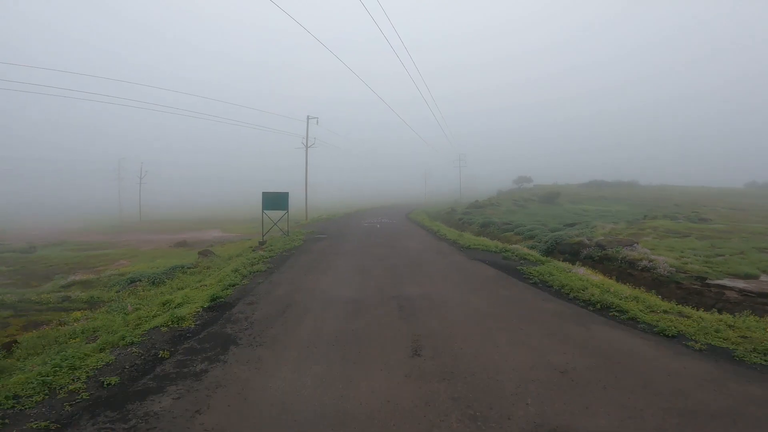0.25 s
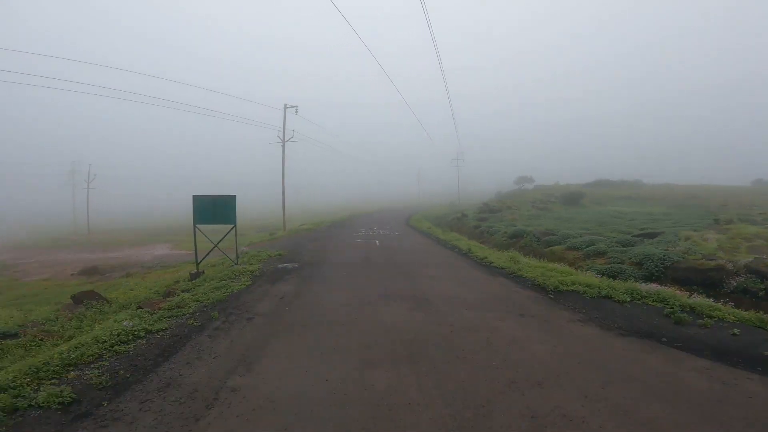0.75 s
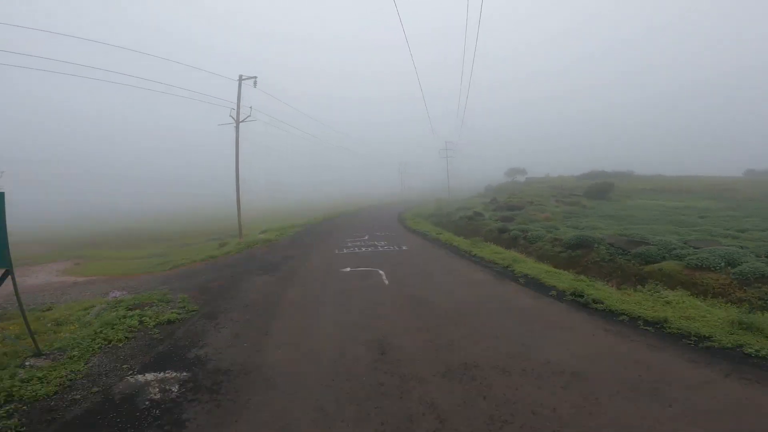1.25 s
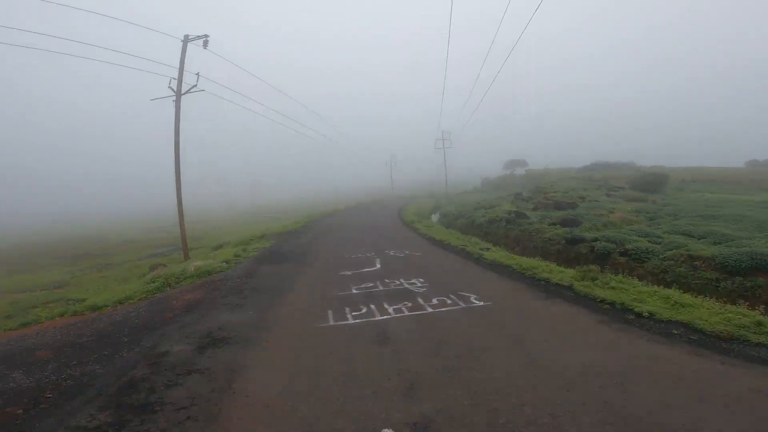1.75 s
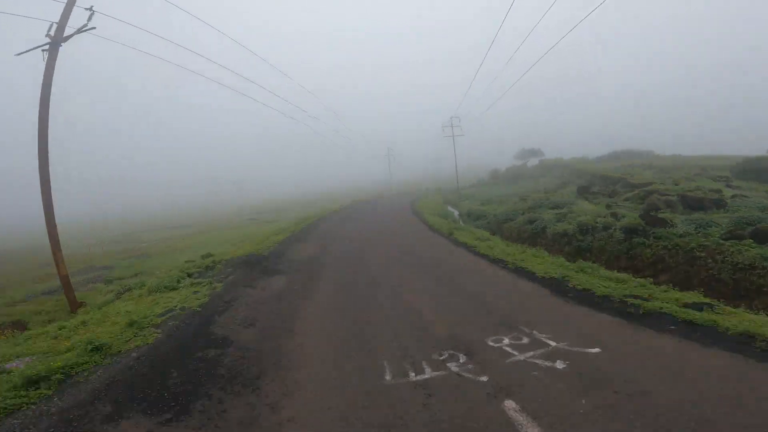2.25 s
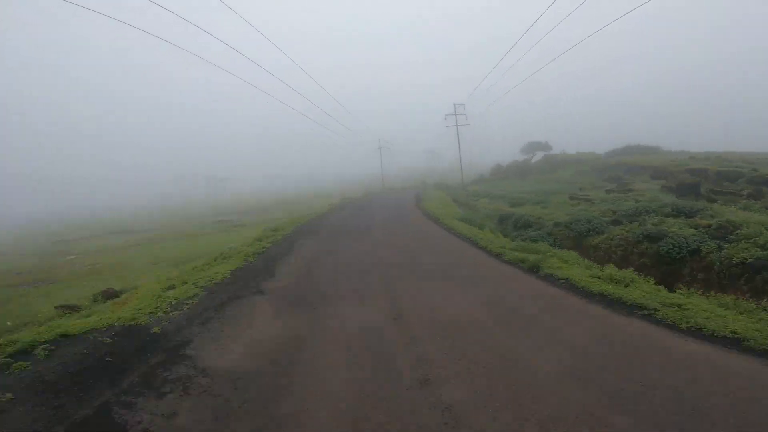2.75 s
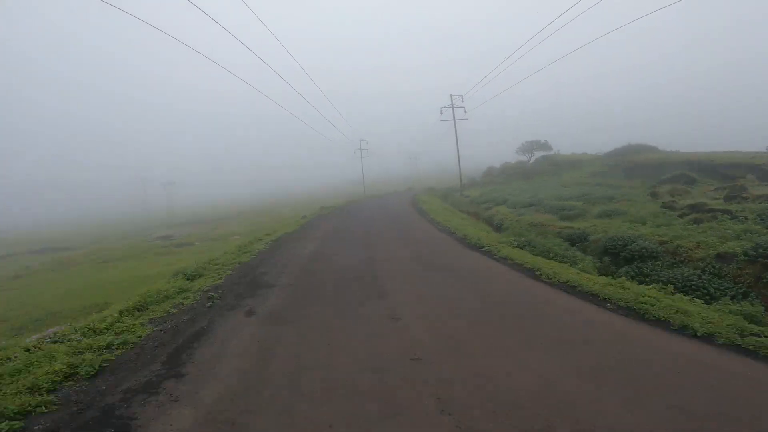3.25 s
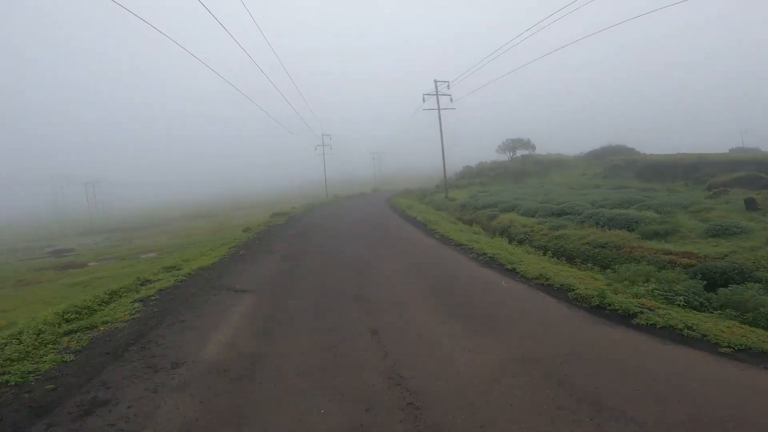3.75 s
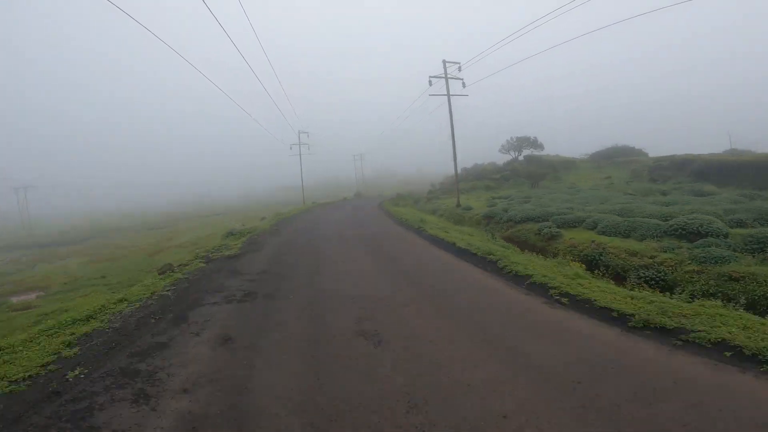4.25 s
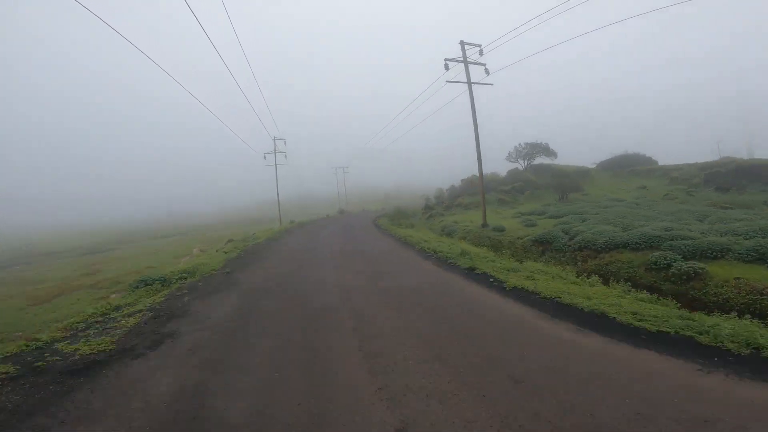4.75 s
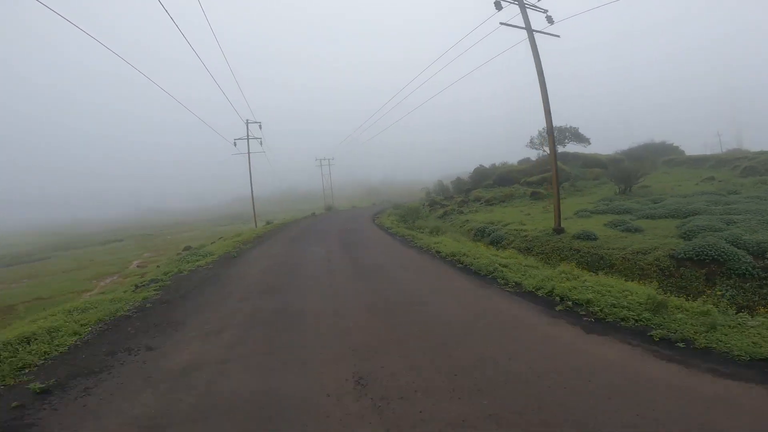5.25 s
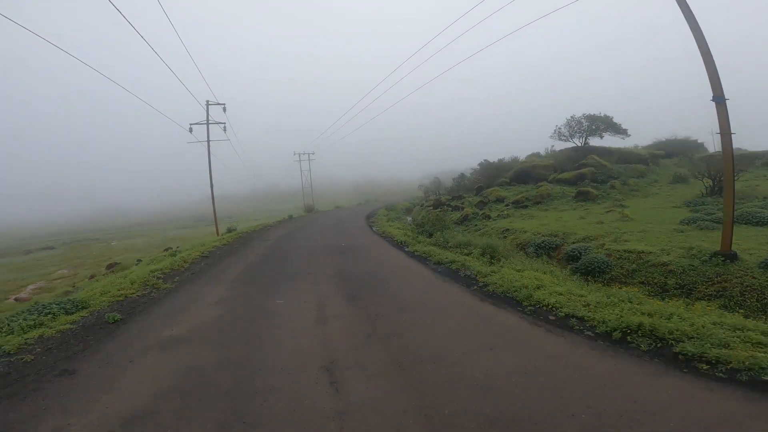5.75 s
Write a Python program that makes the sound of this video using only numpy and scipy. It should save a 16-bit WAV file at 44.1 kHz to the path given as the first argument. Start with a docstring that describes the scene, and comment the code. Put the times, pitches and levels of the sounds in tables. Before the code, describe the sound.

Heard from on board, wind rumbles and gusts over a motorcycle's steady, pulsing engine hum and the rush of tyres on damp asphalt.

```python
"""An exhaust drones and puffs 24 times a second under buffeting wind: a single-cylinder four-stroke
motorcycle cruises along a damp hill road, heard from on board. Each firing sends a pressure pulse down
the pipe; piston, valves and cam chain excite resonances, and all grow louder with the engine's load.
The wind rumbles with brief low swells, while the rush of air and the roar and hiss of the tyres
rise and fall together. A brief sizzle passes early on; later, bits of grit patter and click."""
import sys
import numpy as np
from scipy import signal
from scipy.fft import rfft, irfft
from scipy.io import wavfile
from scipy.ndimage import uniform_filter1d

SR = 44100
rng = np.random.default_rng(int(sys.argv[2]) if len(sys.argv) > 2 else 0)


def dump_mix(stems):
    """Bounce the given channels to the path in sys.argv[1] as a 16-bit WAV at rate SR."""
    frames = np.atleast_2d(stems).T  # one column per channel
    limited = np.clip(frames, -1, 1)  # hard clip at full scale
    pcm = np.round(limited * 32767).astype(np.int16)
    wavfile.write(sys.argv[1], SR, pcm)


N = 264864
T = np.arange(N) / SR
FREQS = np.arange(N // 2 + 1) * SR / N


def exhaust(cycle, load_db):
    """Periodic pressure dips form a harmonic series; the silencer keeps its low end. A puff follows."""
    # harmonics of the firing rate: multiple, level_db
    harmonics = [(1, -8.5), (2, 3.5), (3, -2), (4, -10), (5, 2), (6, -4), (8, -19), (9, -14.5), (10, -10),
                 (12, -8.5), (13, -10), (15, -11.5), (16, -17)]
    drone = 0
    for multiple, db in harmonics:
        delay_turns = 0.13 * rng.standard_normal()  # the pipe delays each harmonic differently
        amplitude = np.sqrt(2) * undb(db + 1.97 * walk(13.4))
        drone -= amplitude * np.cos(2 * np.pi * (multiple * (cycle - .9) + delay_turns))
    puff = ring(bursts(cycle, at=.86, decay=.42, scatter_db=0), [(267, 83, 0)])
    puff = undb(-10.5) * ring(puff, [(296, 660, 0)])
    return undb(-30.7 + .85 * load_db) * (drone + puff)


def piston_knock(cycle, load_db):
    """Impact excitation: the piston rings the crankcase once a cycle, louder as the ride goes on."""
    # crankcase resonances: pitch_hz, width_hz, level_db
    crankcase = [(802, 22, 4.2), (915, 36, -1), (996, 34, 1.2), (1026, 24, 1.6), (1760, 140, -7)]
    rise_db_per_s = 1.0
    knock = ring(bursts(cycle, at=.6, decay=.7, scatter_db=.6), crankcase)
    return undb(-37.7 + .85 * load_db + rise_db_per_s * T) * ring(knock, [(950, 420, 0)])


def valve_taps(cycle, load_db):
    """Two valves tap shut each cycle and excite high modes; the taps come forward late in the ride."""
    # valve gear resonances: pitch_hz, width_hz, level_db
    valve_gear = [(9270, 130, -4), (9670, 120, -1), (10050, 130, 2), (10450, 250, -9)]
    early_db, full_at_s, rise_s = -7, 4.15, .3
    soften_db = early_db * np.clip((full_at_s - T) / rise_s, 0, 1)
    inlet = bursts(cycle, at=.5, decay=.18, scatter_db=1.5)
    outlet = bursts(cycle, at=.22, decay=.15, scatter_db=2)
    return undb(-64.2 + .5 * load_db + soften_db) * ring(inlet + .5 * outlet, valve_gear)


def cam_chain(cycle, load_db):
    """Forced vibration: nearly steady noise keeps the chain's modes singing, slowly growing louder."""
    # chain resonances: pitch_hz, width_hz, level_db
    modes = [(3590, 210, 3), (6080, 180, -1.5), (7410, 120, -6.5), (8460, 90, 1.5), (8660, 80, -6)]
    rise_db_per_s = .7
    rattle = bursts(cycle, at=.26, decay=2.4, scatter_db=1.5)
    return undb(-61.3 + .6 * load_db + rise_db_per_s * T) * ring(rattle, modes)


def wind(flow_db):
    """Turbulence: large eddies push on the microphone; small ones make a rush that gusts brighten."""
    # strength of the buffeting: time_s, gain_db
    buffeting = [(0.0, -2.2), (0.28, 3.5), (0.45, -2), (.58, -1.5), (.7, 1.5), (.79, -3), (.88, 1.5),
                 (1.17, 3), (1.3, -2), (1.54, -3), (1.63, -9.5), (1.73, -8), (1.8, -3), (1.95, -1.5),
                 (2.14, 2.5), (2.34, -1), (2.52, 2.5), (2.75, 1.5), (2.9, -4), (3.04, 2.5), (3.45, 1.5),
                 (3.58, -2), (4.05, -2.5), (4.32, 3), (4.72, -1), (4.95, 2), (5.1, 0), (5.85, 2), (6.0, 2)]
    # spectrum of the large eddies: frequency_hz, density_db
    buffet_spectrum = [(1, 5), (4, 4.5), (9, 13.5), (16, -8), (30, -0.5), (45, -11), (65, -15.5),
                       (110, -14.5), (200, -25.5), (500, -70), (3000, -100)]
    # spectrum of the small eddies: frequency_hz, density_db
    rush_spectrum = [(50, 4), (110, -2.5), (170, 1.5), (300, 1), (420, -1), (550, -6.5), (700, -9.5),
                     (1200, -14), (2500, -34), (6000, -82), (15000, -85)]
    push_db, = curves(buffeting)
    eddies = colour(rng.standard_normal(N), buffet_spectrum)
    eddies = 5 * np.tanh(eddies / 5)  # a soft limit keeps the loudest buffets from clipping
    rush = colour(rng.standard_normal(N), rush_spectrum)
    coarse = lowpass(rush, cutoff_hz=330)
    fine = (rush - coarse) * undb(.3 * flow_db)
    rumble = coarse * undb(.35 * push_db)
    flutter_db = .67 * walk(17)
    return undb(-22 + push_db) * eddies + undb(-24.5 + .72 * flow_db + flutter_db) * (rumble + fine)


def low_swells():
    """Amplitude envelopes on low noise bands give brief, dull swells in the wind's rumble."""
    # brief swells in the rumble: centre_s, half_length_s, level_db, pitch_hz
    swells = [(0.321, 0.054, -23.5, 209), (1.004, .05, -21.5, 69.6), (1.15, 0.049, -24, 95),
              (2.124, 0.065, -22, 90), (2.506, .04, -21, 84.1), (2.704, 0.051, -25, 259.9),
              (3.06, 0.074, -19.5, 86), (4.416, 0.034, -20, 79), (4.949, 0.046, -23, 80),
              (5.9, .04, -20, 99)]
    out = np.zeros(N)
    for centre_s, half_length_s, db, hz in swells:
        envelope = np.cos(np.pi / 2 * np.clip((T - centre_s) / half_length_s, -1, 1)) ** 2
        swell = envelope * bandpass(rng.standard_normal(N), hz, width_hz=1.5 * hz)
        out += undb(db) * swell * np.sqrt(np.sum(envelope ** 2) / np.sum(swell ** 2))
    return out


def tyres(flow_db):
    """Rolling noise: tread roars on coarse asphalt and throws a grainy hiss, varying patch by patch."""
    # spectrum of the tread's roar: frequency_hz, density_db
    roar_spectrum = [(300, -19), (650, -5), (900, 0.6), (1100, -4.5), (1350, -6.5), (1750, -11.5),
                     (2100, -16), (2900, -23), (5000, -47)]
    # spectrum of the spray's hiss: frequency_hz, density_db
    hiss_spectrum = [(1500, -7.5), (2700, -1.5), (3600, 2.5), (4000, 1.5), (4900, 1.5), (6100, -2.5),
                     (6500, -7), (7100, -9), (7800, -7), (9000, -13), (10500, -14.5), (12500, -19),
                     (15500, -25)]
    # hiss on damper and drier stretches: time_s, gain_db
    spray = [(0, 8), (.07, 3), (.13, 4), (.35, 2), (.6, 0.5), (1.0, -1), (1.3, 0.3), (1.9, 1.5), (2.2, 0.8),
             (2.7, 0), (3.55, 0.5), (4.1, 0.5), (4.8, -0.2), (6, 0.5)]
    spray_db, = curves(spray)
    patches = undb(.6 * walk(6) + .4 * walk(30))
    sign_db = 2 * np.exp(-((T - 1.2) / .16) ** 2)  # the roar swells as a roadside sign goes by
    roar = undb(-32 + .85 * flow_db + sign_db) * colour(rng.standard_normal(N), roar_spectrum)
    droplets = rng.standard_normal(N) * undb(2 * rng.standard_normal(N))
    hiss = undb(-49.5 + 1.15 * flow_db + spray_db) * colour(droplets, hiss_spectrum)
    return patches * (roar + hiss)


def grit():
    """Impulse response: each small stone strikes, bounces at once and gives a heavily damped click."""
    # stones flung against the bike: start_s, peak_db, pitch_hz
    stones = [(2.410, -44, 9500), (2.5965, -41, 10000), (2.728, -44, 9700), (3.367, -41, 9300),
              (3.4476, -43, 9580), (3.4795, -42, 9080), (3.491, -42, 9700), (3.5585, -35.5, 10700)]
    bounce_s = .0008
    out = np.zeros(N)
    for start_s, db, hz in stones:
        contact = np.zeros(N)
        contact[int(start_s * SR)] = 1
        contact[int((start_s + bounce_s) * SR)] = .5
        click = bandpass(contact, hz, width_hz=2500)
        out += undb(db) * click / np.abs(click).max()
    return out


def sizzle():
    """Narrow-band noise: a high hiss swells, holds and decays exponentially."""
    start_s, attack_s, hold_s, fade_db_per_s = .18, .15, .06, 18
    attack = np.clip((T - start_s) / attack_s, 0, 1)
    fade_db = fade_db_per_s * np.maximum(T - start_s - attack_s - hold_s, 0)
    return attack * undb(-54 - fade_db) * bandpass(rng.standard_normal(N), 4220, width_hz=750)


def patter():
    """Shot noise: fine grains of uneven size tick against the bike where the road is gritty."""
    start_s, end_s, grains_per_s = 2.1, 3.7, 220
    stretch = uniform_filter1d(1. * ((T > start_s) & (T < end_s)), size=SR // 5)
    grains = (rng.random(N) < grains_per_s / SR) * undb(3 * rng.standard_normal(N))
    return undb(-66.5) * stretch * bandpass(grains, 9650, width_hz=1500)


def bursts(cycle, at, decay, scatter_db):
    """Exponentially decaying noise, struck unevenly once a cycle; at and decay are in cycles."""
    since = cycle - at % 1 + 1
    strength = undb(scatter_db * rng.standard_normal(N))[since.astype(int)]
    return strength * np.exp(-(since % 1) / decay) * rng.standard_normal(N)


def ring(x, modes):
    """Superposition of damped resonances (pitch_hz, width_hz, level_db) driven by x; rms 1."""
    response = sum(undb(db) * 1j * FREQS * width / (hz ** 2 - FREQS ** 2 + 1j * FREQS * width)
                   for hz, width, db in modes)
    return unit(irfft(rfft(x) * response, N))


def bandpass(x, hz, width_hz):
    """Two like resonators in series, each width_hz wide, give a band with steeper skirts; rms 1."""
    mode = [(hz, width_hz, 0)]
    return ring(ring(x, mode), mode)


def colour(x, spectrum):
    """Spectral shaping of a white signal; the audible part has an rms of 1."""
    hz, db = np.transpose(spectrum)
    shaped = rfft(x) * undb(np.interp(np.log(np.maximum(FREQS, 1)), np.log(hz), db))
    return irfft(shaped, N) / np.std(irfft(shaped * (FREQS > 20), N))


def lowpass(x, cutoff_hz):
    """Zero-phase filter that falls 24 dB an octave above the cutoff."""
    return irfft(rfft(x) / (1 + (FREQS / cutoff_hz) ** 4), N)


def walk(rate_hz):
    """Low-passed noise: a smooth random wander with an rms of 1."""
    return unit(lowpass(rng.standard_normal(N), rate_hz))


def curves(table):
    """Linear interpolation of each column over the times in the first."""
    time_s, *columns = np.transpose(table)
    return [np.interp(T, time_s, column) for column in columns]


def undb(db):
    """Decibels to amplitude ratio."""
    return 10 ** (np.asarray(db) / 20)


def unit(x):
    """Normalise to an rms of 1."""
    return x / np.sqrt(np.mean(x ** 2))


def scene():
    """Superposition: engine, wind and road add at one nearby microphone."""
    # engine speed, and load relative to cruising: time_s, firing_hz, load_db
    running = [(0, 23.85, -6.5), (.6, 24.37, 0), (1.1, 24.71, -1), (1.65, 25.07, -8), (1.92, 24.91, -3),
               (2.05, 24.84, 0), (2.4, 24.23, -5), (3.0, 24.5, -1), (3.75, 24.04, -5), (4.3, 23.88, 1),
               (4.6, 23.82, -1.5), (5.0, 23.97, 0.5), (5.55, 23.77, 3.5), (6.0, 23.78, 2)]
    # air streaming past, relative to cruising: time_s, flow_db
    airflow = [(0.0, -4), (0.17, -8.5), (0.33, -2), (.46, -3), (.57, 0.2), (.85, -0.6), (.98, 2),
               (1.1, -0.1), (1.25, 4), (1.34, 1.2), (1.45, -2.4), (1.56, 1), (1.63, -3.3), (1.8, -0.5),
               (1.9, -1.5), (1.98, 0), (2.23, 3), (2.55, 1.2), (2.7, 0.7), (2.82, 0.1), (2.95, 2),
               (3.14, 2.5), (3.38, 1.5), (3.52, 3), (3.7, 0.5), (3.9, -0.2), (4.08, -2), (4.3, -1.3),
               (4.55, 0.7), (4.67, 1), (5.1, 0.9), (5.5, 2), (5.78, -1.4), (5.97, 2.5)]
    firing_hz, load_db = curves(running)
    flow_db, = curves(airflow)
    jitter = 1 + .0025 * walk(15.4)  # no two firings push the crank quite alike
    cycle = np.cumsum(firing_hz * jitter) / SR
    engine = sum(part(cycle, load_db) for part in (exhaust, piston_knock, valve_taps, cam_chain))
    return (engine + wind(flow_db) + low_swells() + tyres(flow_db) + sizzle() + grit() + patter())[None]


def record(dry):
    """Band limiting: the camera on the bike cuts the top treble; short fades keep the ends click-free."""
    top_hz, fade_s = 15650, .004
    edges = np.clip(np.minimum(T, T[-1] - T) / fade_s, 0, 1)
    treble_cut = signal.ellip(12, .1, 80, top_hz, fs=SR, output="sos")
    return signal.sosfilt(treble_cut, dry * edges)


dry = scene()
out = record(dry)
dump_mix(out)
```